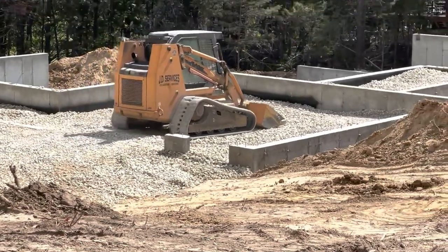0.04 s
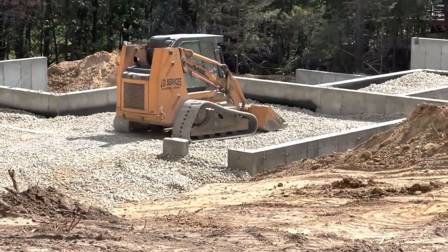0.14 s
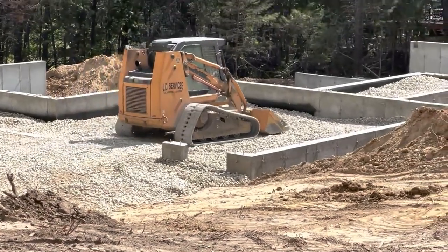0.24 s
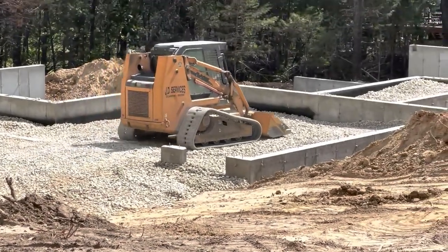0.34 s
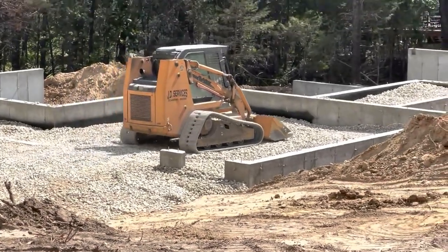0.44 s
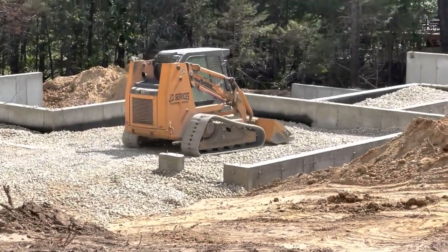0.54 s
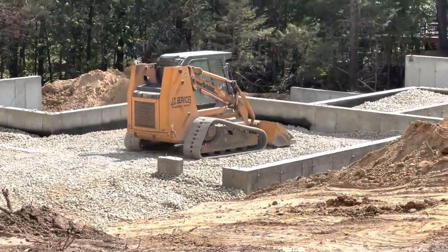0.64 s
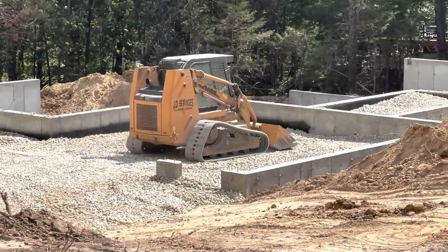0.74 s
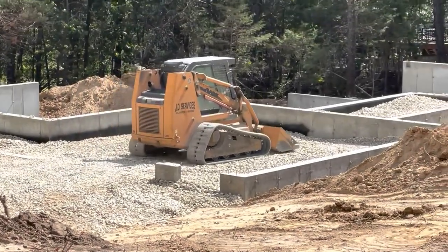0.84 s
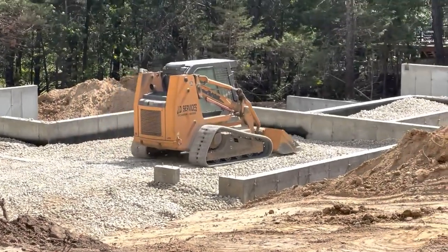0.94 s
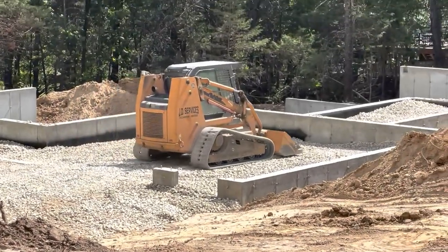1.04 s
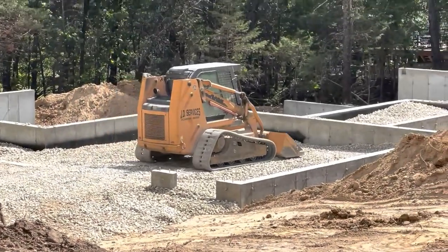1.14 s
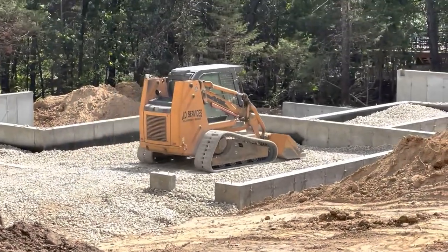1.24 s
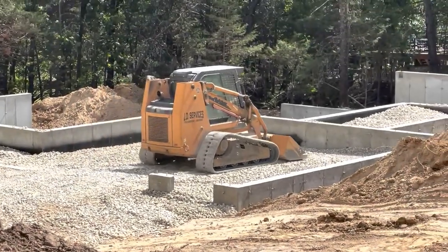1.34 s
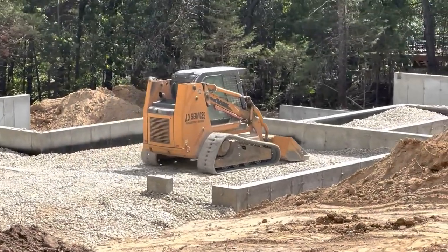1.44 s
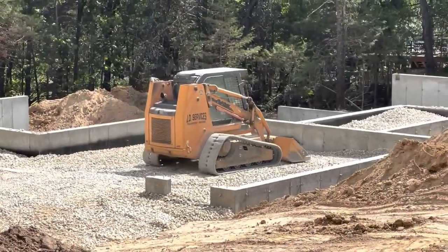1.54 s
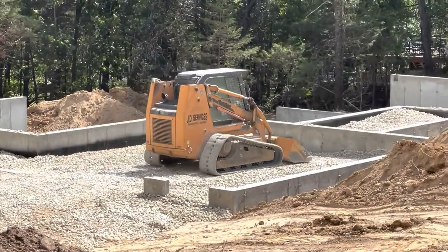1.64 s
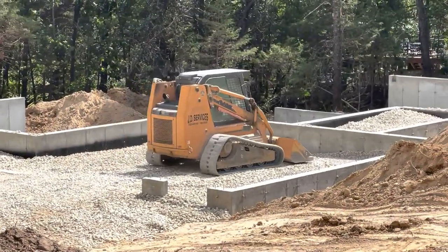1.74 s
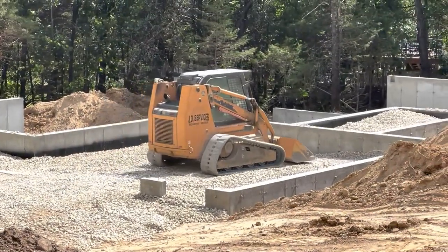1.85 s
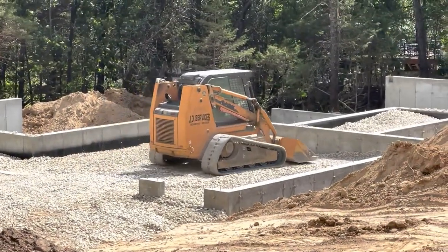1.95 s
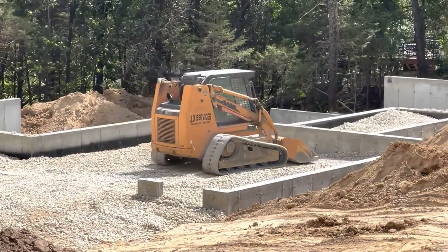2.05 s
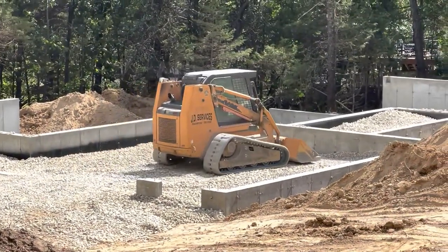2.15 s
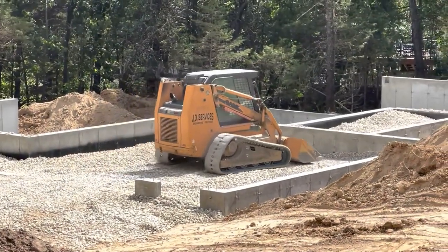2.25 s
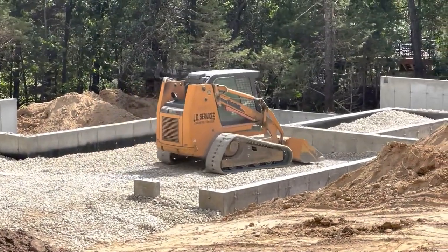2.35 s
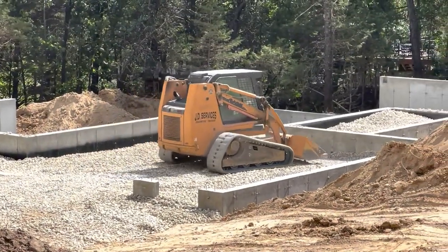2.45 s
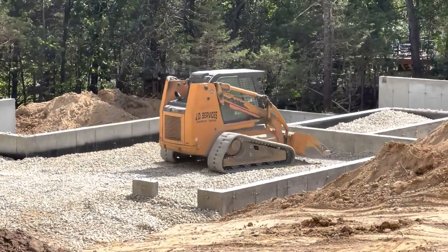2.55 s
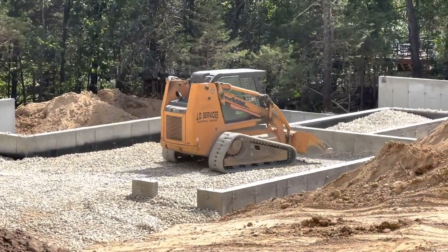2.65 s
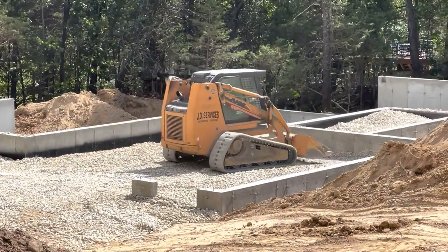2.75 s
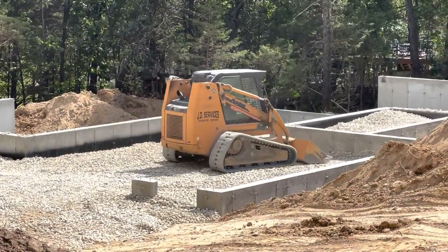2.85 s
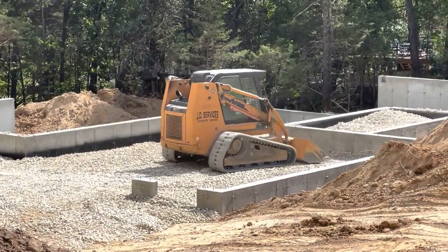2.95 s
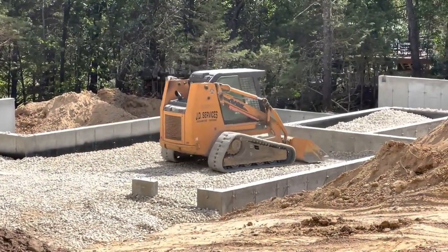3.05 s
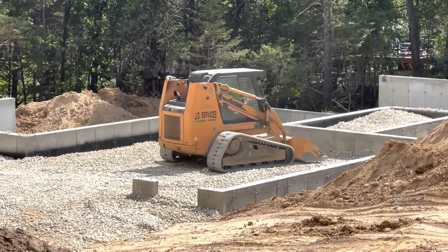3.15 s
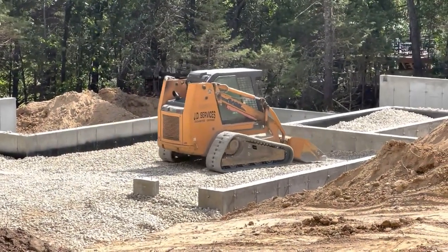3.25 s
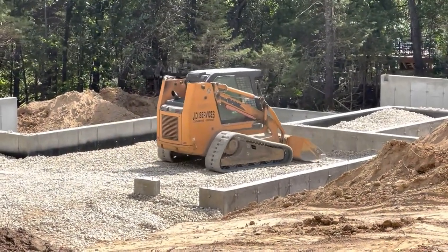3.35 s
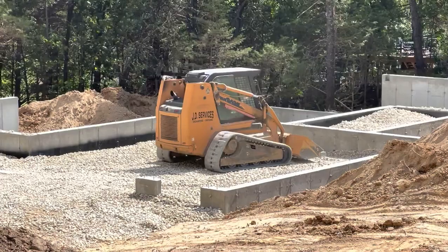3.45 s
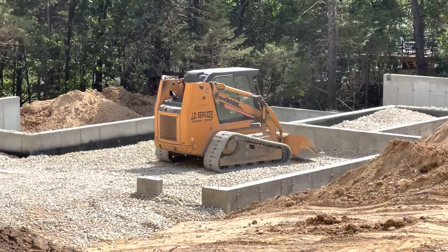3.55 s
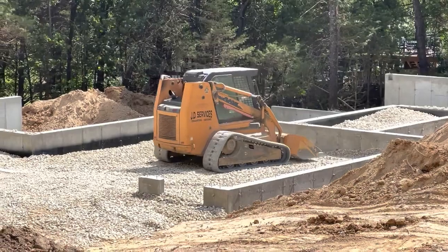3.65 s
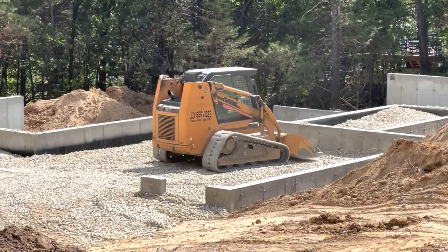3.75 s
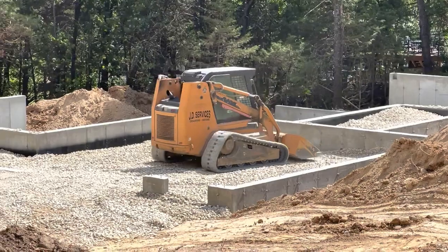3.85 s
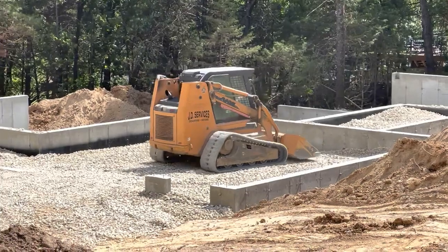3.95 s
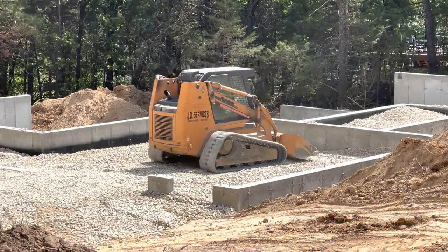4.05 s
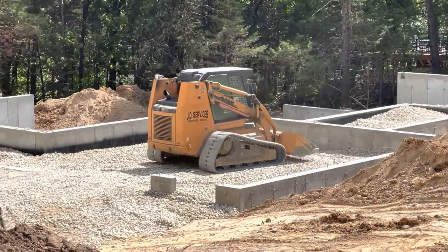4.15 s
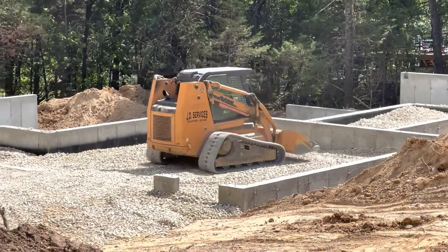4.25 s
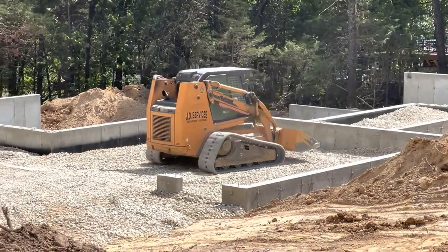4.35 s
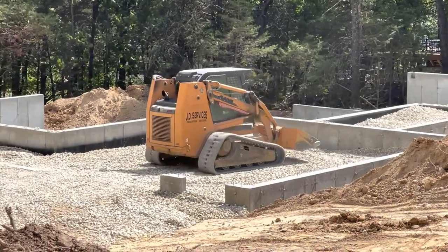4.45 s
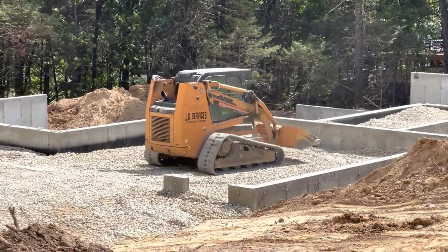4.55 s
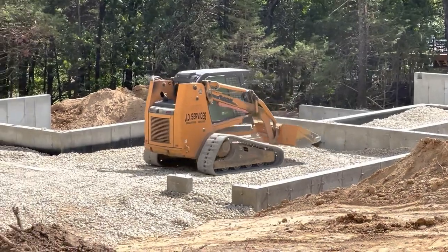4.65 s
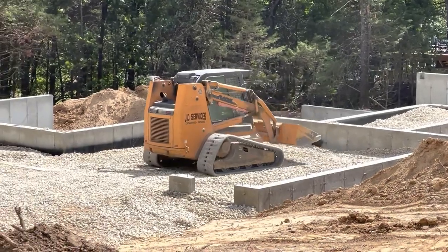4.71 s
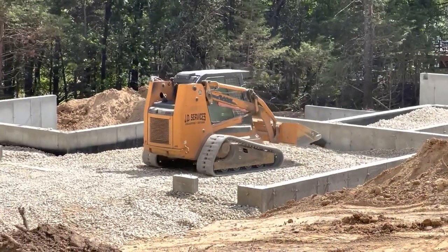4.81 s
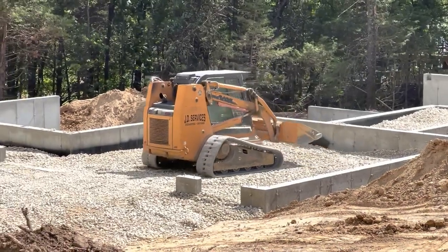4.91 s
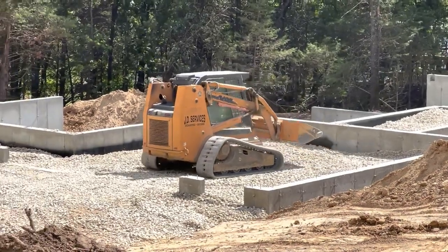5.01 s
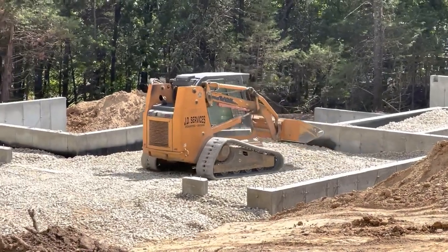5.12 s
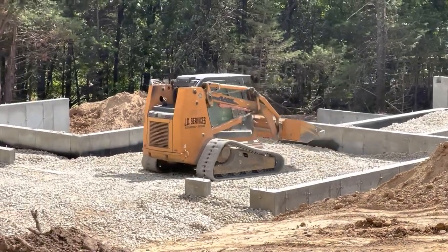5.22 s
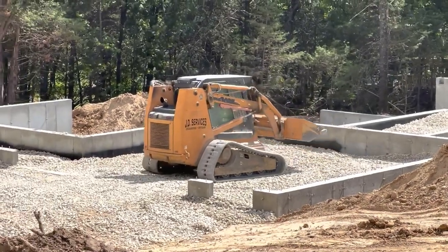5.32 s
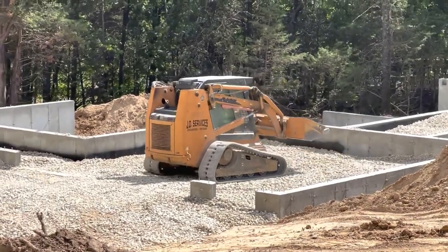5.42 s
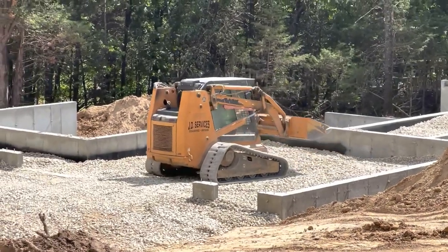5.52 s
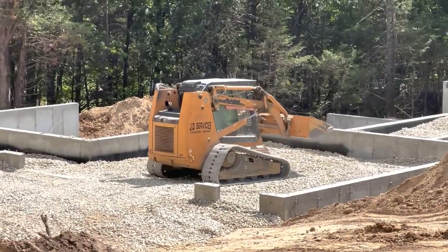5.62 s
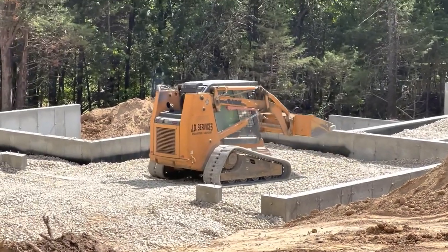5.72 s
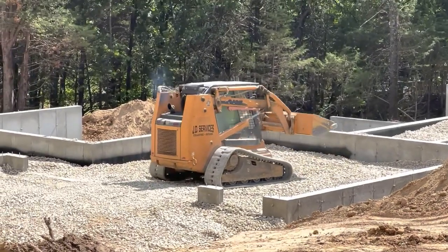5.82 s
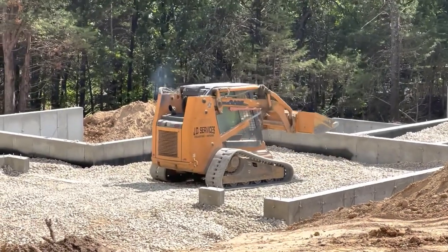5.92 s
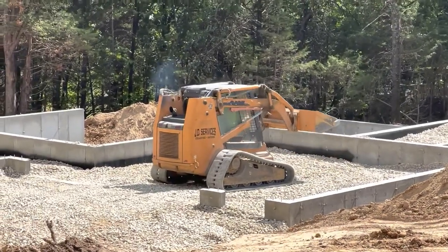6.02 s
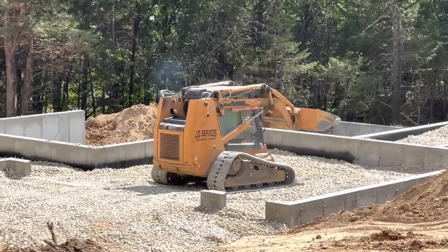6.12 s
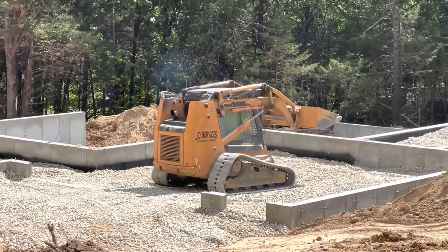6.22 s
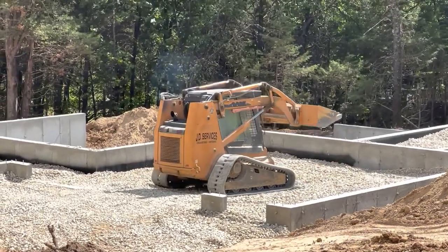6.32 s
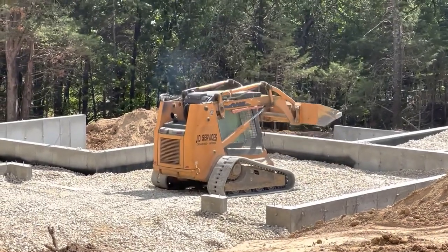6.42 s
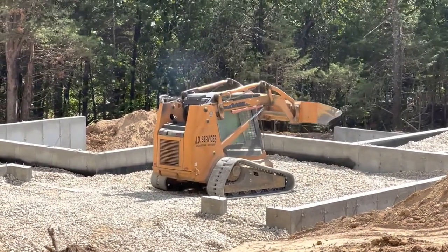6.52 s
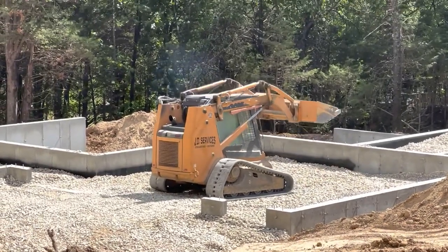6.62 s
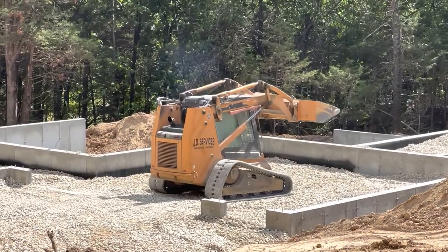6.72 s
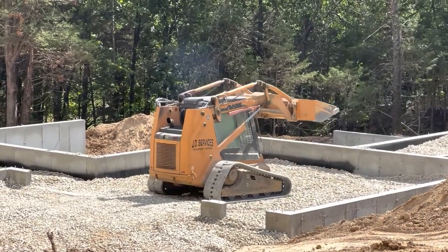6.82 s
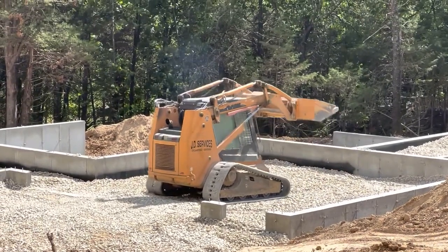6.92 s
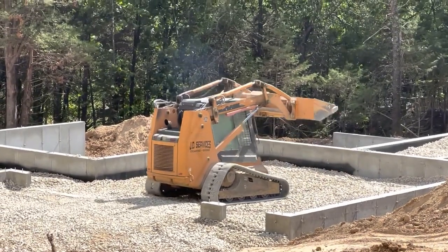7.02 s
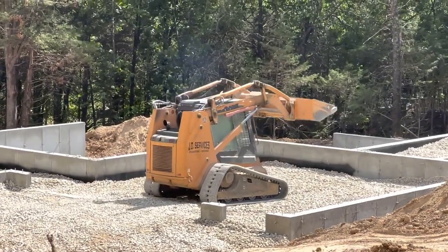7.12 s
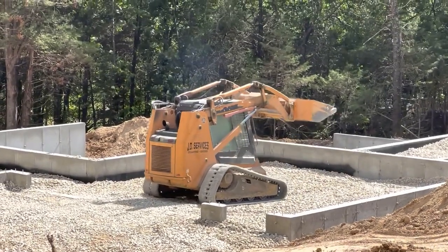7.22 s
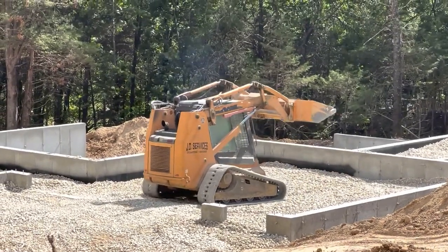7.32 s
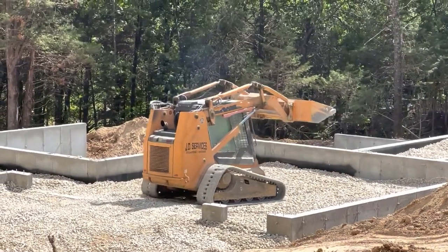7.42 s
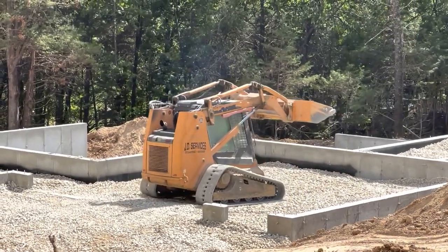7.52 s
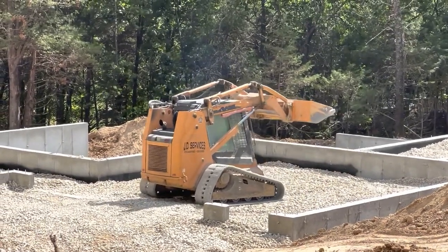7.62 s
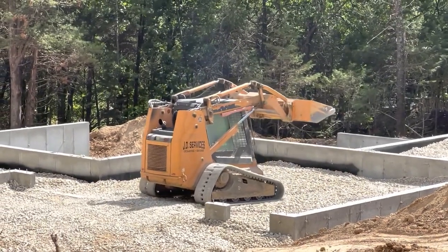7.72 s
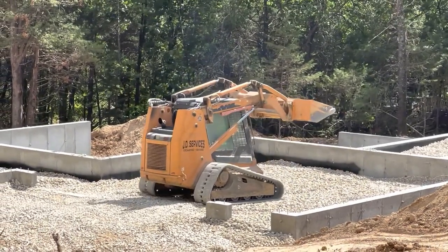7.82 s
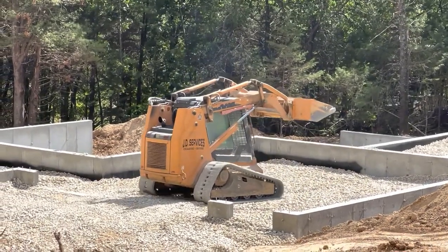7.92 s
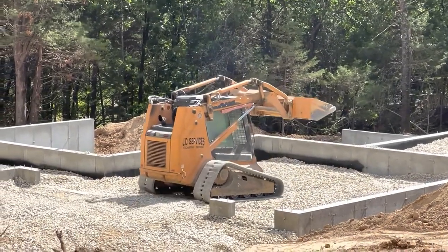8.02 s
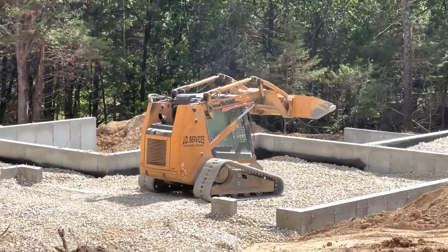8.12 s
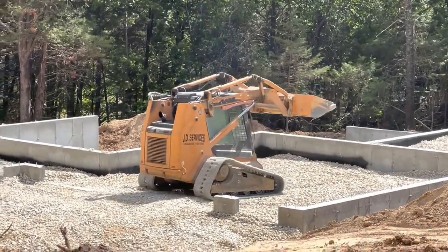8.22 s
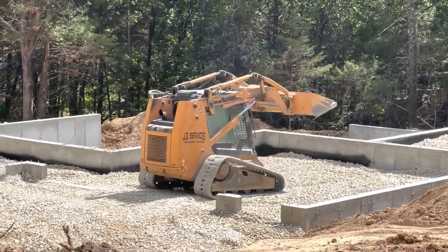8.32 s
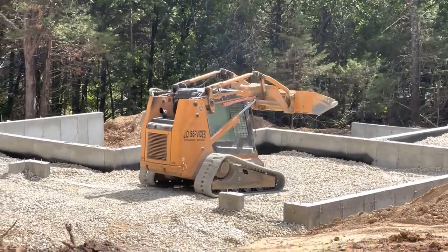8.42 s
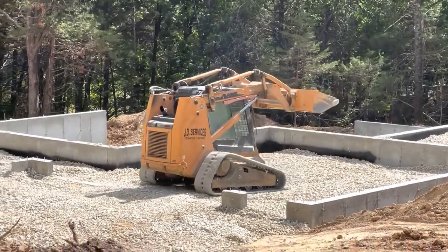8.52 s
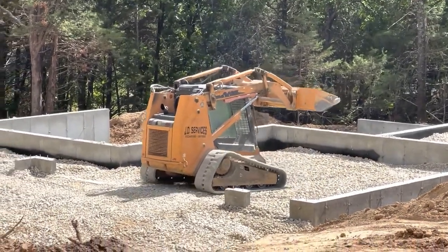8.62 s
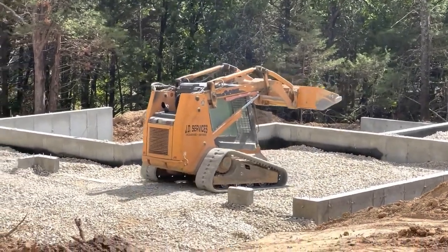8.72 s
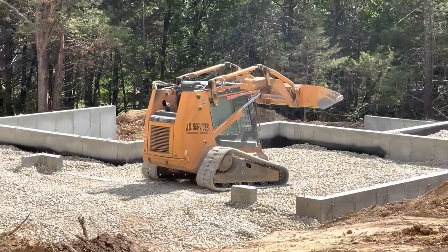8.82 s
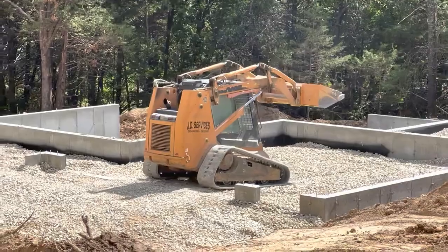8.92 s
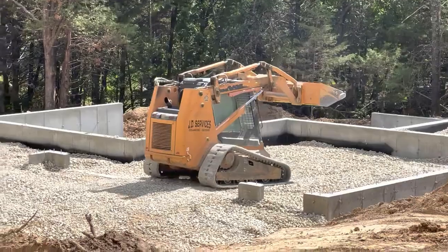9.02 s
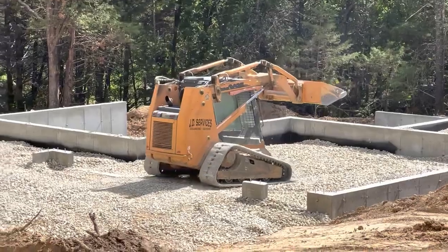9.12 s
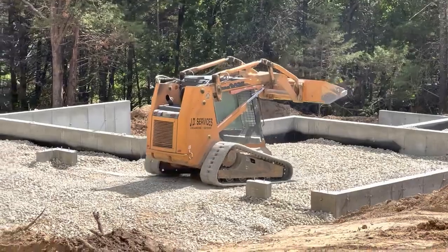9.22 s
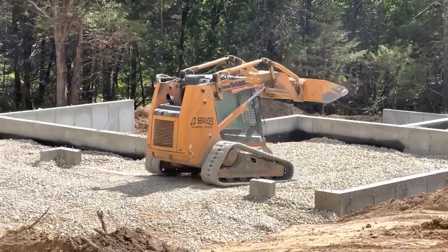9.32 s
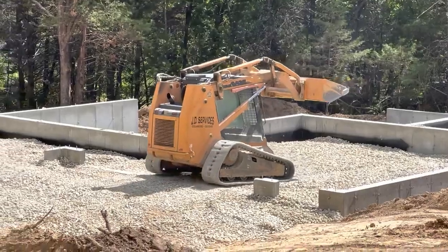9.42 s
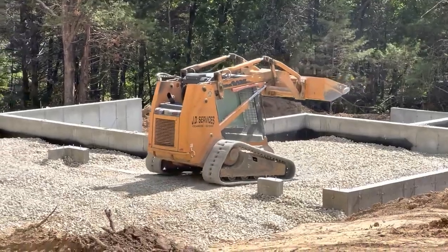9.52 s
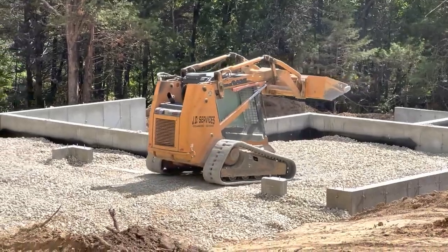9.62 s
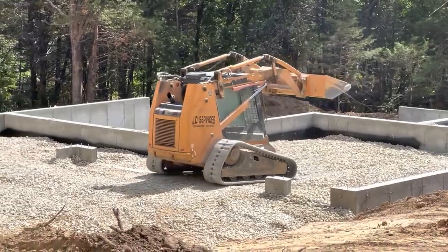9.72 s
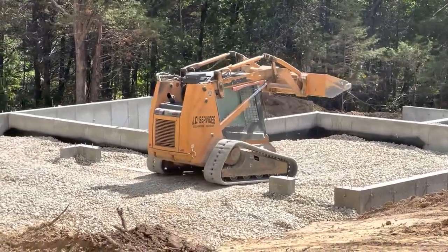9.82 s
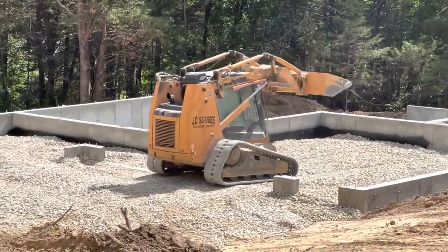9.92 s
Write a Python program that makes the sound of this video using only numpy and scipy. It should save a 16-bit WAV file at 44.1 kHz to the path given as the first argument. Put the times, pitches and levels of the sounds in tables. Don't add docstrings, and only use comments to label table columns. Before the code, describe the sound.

A diesel tracked loader runs throughout, some way off in the open, nearly mono with only slight scattered echo. Its low firing throb sits near 53 Hz under fan roar, valve clatter, pump tones and a fuzzy blower whine around 2.4 kHz. From 0 to 2.5 s rolling tracks add hiss, fine ticks and short high squeaks, with stone knocks at 0.8 and 1.3 s. At 2.8-3.1 s the bucket bites gravel: dense bright crunch, cracks and hollow booms. A duller, boomy bite comes at 3.7 s with small clanks. Ticks and knocks continue; from 4.8 s the engine sags. At 5.6 s throttle makes it surge, rising until about 6.3 s, and fall back by 6.8 s. Chirps and a sharp steel clank land at 6.7-6.9 s. It then drones steadily, slowing slightly, with squeaks at 8.0 and 9.3-9.4 s and light clanks near 9.6 s, still running at the end.

```python
import sys
import numpy as np
from scipy import signal
from scipy.fft import rfft, irfft, next_fast_len
from scipy.io import wavfile
from scipy.ndimage import uniform_filter1d

SR = 44100
rng = np.random.default_rng(int(sys.argv[2]) if len(sys.argv) > 2 else 0)


def level_to_linear(level):
    exponent = np.asarray(level, float) / 20
    return 10 ** exponent


def transcribe(u):
    v = np.clip(np.atleast_2d(u).T, -1, 1)
    q = np.round(v * 32767).astype(np.int16)
    wavfile.write(sys.argv[1], SR, q)


N = 439236

# freq_hz, lead_rad
PORT_LEAD_RAD = [(0, .11), (110, .2), (250, .1), (400, .08), (4200, 0.07), (5350, 1.0), (5850, 0.3),
                 (6900, 0.9), (7250, 0.3), (7750, 3.14), (9300, 2.95), (10200, 0.2), (11150, -0.2),
                 (12750, -3.14), (13850, -3.14), (14700, -5.7), (22050, -7)]
# freq_hz, level_db
PORT_LEAN_DB = [(40, -0.6), (250, 0), (600, -1.5), (1100, 0.7), (2000, -0.9), (16000, 1.6)]
# freq_hz, level_db
SCATTER_DB = [(40, -65), (100, -54), (220, -36), (520, -13.5), (900, -16.5), (1400, -22), (2000, -43),
              (4000, -22), (7200, -12.5), (8200, -16), (11500, -8), (13500, -15), (16000, -17)]
# start_s, level_db
TICKS = [(1.2316, -41), (1.3054, -46), (1.5519, -46), (1.6609, -43), (1.7818, -40), (1.8846, -40),
         (1.9165, -35), (1.9697, -41), (2.0338, -39), (2.2184, -45), (2.3206, -45), (2.4134, -45),
         (2.6628, -44), (2.9487, -47), (3.9125, -38), (3.9893, -43), (4.0916, -42), (4.1979, -37),
         (4.2857, -41), (4.3146, -42), (4.385, -43), (4.4692, -43), (4.5528, -37.5), (4.8085, -44),
         (5.0913, -45), (5.2004, -45), (6.4016, -37), (6.8743, -45), (9.0478, -51), (9.7624, -51)]
# start_s, length_s, first_hz, last_hz, peak_db
SQUEAKS = [(0.672, 0.025, 5250, 5100, -39.5), (.708, .035, 5150, 5000, -45), (1.173, 0.13, 6500, 6600, -35),
           (1.27, 0.09, 6430, 6620, -40.5), (1.274, .045, 7150, 7140, -40), (1.87, 0.035, 6300, 6250, -50),
           (1.975, 0.032, 5300, 4900, -44), (2.07, .022, 5230, 5300, -41), (2.083, 0.023, 4960, 5000, -34),
           (2.099, .016, 4750, 4450, -35), (2.125, 0.023, 4750, 4200, -39), (2.113, 0.047, 4650, 5200, -41),
           (2.15, 0.044, 5280, 5340, -44), (9.571, .06, 2700, 2680, -48), (2.518, 0.07, 7180, 6930, -34),
           (2.512, 0.045, 8600, 8350, -30), (2.64, .04, 6500, 6400, -51), (3.99, 0.095, 12400, 12400, -48),
           (4.22, .09, 8770, 8700, -50), (6.663, 0.025, 2880, 2900, -38), (6.681, .035, 2950, 2920, -39),
           (6.772, 0.019, 2950, 2900, -37), (6.768, .02, 3200, 3150, -40), (6.782, 0.03, 3140, 3100, -38),
           (6.831, .026, 3400, 3200, -37), (8.039, 0.12, 3380, 3760, -40), (8.148, .06, 3650, 3400, -46),
           (9.297, .025, 3350, 3330, -45), (9.349, .03, 3300, 3280, -37), (9.37, .035, 3350, 3350, -47),
           (9.391, 0.04, 3240, 3080, -34), (9.415, .035, 3050, 3000, -41), (9.42, 0.056, 3270, 3310, -33.5),
           (9.57, 0.12, 1900, 1870, -49), (9.398, .06, 6140, 6560, -58), (6.675, .035, 5800, 5850, -51),
           (6.772, .035, 5900, 5850, -48), (6.775, .03, 6200, 6150, -52)]
# freq_hz, density_db_per_hz
STONE_DB = [(150, 2), (480, -10), (800, 2), (1500, 3.5), (3900, 1.5), (5500, -8.5), (7300, -15),
            (8500, -38), (10000, -18.5), (13000, -42), (15500, -52)]
# start_s, level_db, ring_hz
KNOCKS = [(0.8056, -27.5, 3500), (1.284, -27.5, 3690), (2.823, -32, 3680), (2.854, -30, 2960),
          (3.149, -29.5, 3230), (3.3994, -34, 4060), (3.8785, -30, 4150), (3.884, -34, 2500),
          (4.2994, -33, 2590), (4.3894, -40, 3250), (4.587, -30, 3450), (4.7696, -30.5, 3900),
          (6.8356, -32, 3340), (9.559, -28, 4050), (9.656, -27.5, 4170), (9.7597, -38, 3550),
          (9.8494, -44, 4720)]
# start_s, level_db, ring_hz
CLANKS = [
    (3.729, -23, 1900),
    (3.757, -22, 1900),
    (6.906, -15, 2150),
    (6.907, -28, 4050),
    (9.5597, -30, 1890),
    (9.6564, -24, 1965),
]
# start_s, level_db, ring_hz
BOOMS = [(2.8, -20, 764), (2.86, -20, 950), (2.912, -15, 880), (2.94, -13, 810), (2.948, -10, 200),
         (2.972, -9, 300), (2.982, -16, 440), (3.002, -16, 800), (3.03, -19, 258), (3.688, -5, 270),
         (3.707, -9, 265)]
# start_s, level_db, ring_hz
CRACKS = [(2.9489, -9.5, 4400), (2.951, -8, 2950), (2.9555, -5, 3300), (2.963, -8, 3600),
          (3.0013, -9, 3870), (2.996, -11, 2050), (3.0032, -11, 1890), (3.005, -10, 2500),
          (3.012, -12, 1960), (3.058, -15, 2620), (3.669, -13, 910), (3.678, -14, 1830), (3.689, -15, 1400),
          (3.7635, -17, 2500), (3.764, -21, 4150), (3.756, -19, 3100), (3.758, -18, 1500),
          (3.679, -26, 3200)]
# start_s, crunch_db, thud_db, dullness_0_to_1
BITES = [(2.8, -37, -31, .3), (2.824, -34.5, -42, 0.25), (2.869, -41, -32, .25), (2.89, -31, -38, 0.4),
         (2.908, -27, -29, 0.3), (2.933, -24, -47, 0.36), (2.944, -26, -40, 0), (2.954, -19.5, -24.5, 0.1),
         (2.967, -21, -31, 0), (2.976, -31, -22.5, 0), (2.987, -29, -21.5, 0), (2.996, -19.5, -24.5, 0),
         (3.006, -19, -35, 0), (3.019, -30, -33, 0.4), (3.034, -43, -31, .05), (3.05, -28, -40, 0.05),
         (3.07, -31, -34, 0), (3.095, -34.5, -32, 0.1), (3.672, -27.5, -43, 0.95), (3.682, -29, -43, 0.9),
         (3.691, -29, -31, .9), (3.703, -37, -32, 1), (3.715, -41, -38, 1), (3.73, -38, -42, 1),
         (3.755, -29, -49, 0.5), (3.766, -30, -52, 0.5), (3.777, -34, -52, .6)]
# time_s, firing_hz
SPEED_HZ = [(0, 53.4), (2.6, 53.3), (2.9, 54.5), (3.6, 54.6), (4.8, 52.0), (5.05, 48), (5.62, 46.2),
            (5.71, 49.1), (5.91, 60.7), (6.02, 64.8), (6.12, 67), (6.3, 67.6), (6.45, 66.3), (6.55, 63.3),
            (6.77, 53.6), (6.9, 52.1), (8.85, 50.8), (9.96, 49.5)]
# time_s, firing_tone_db, roar_db
EFFORT_DB = [(0, -31.5, -33.5), (1.08, -32, -33.5), (2.14, -30, -36), (2.66, -29.5, -36),
             (2.83, -33.5, -35.5), (2.97, -29.5, -36.5), (3.7, -30.5, -35), (4.6, -28, -34.5),
             (5.22, -32.5, -36.5), (5.6, -37.5, -38), (5.72, -24.5, -31.5), (5.85, -21.5, -32.5),
             (6.02, -20.5, -32.5), (6.35, -26.5, -33.5), (6.52, -22, -35), (6.88, -32.5, -35),
             (7.05, -31, -35), (9.96, -29, -35)]
# start_s, end_s, lift_db
STRAIN_DB = [
    (.12, .3, 5),
    (.5, 1.4, 4),
    (3.45, 3.7, 3),
    (3.95, 4.76, 5),
    (6.65, 6.83, 10),
    (7.3, 8.0, -7),
    (9.1, 9.96, 5.5),
]
# start_s, end_s, hiss_lift_db
ROLLING_DB = [
    (0, 1.15, 5.5),
    (1.35, 2.45, 6.5),
    (3.85, 5.25, 3),
    (6.2, 6.5, 1),
    (6.8, 7.3, -2),
    (7.45, 9.1, -0.5),
    (9.5, 9.96, -2),
]
# start_s, end_s, lift_db
BLOWER_DB = [(0, .3, 7), (.3, .95, 1), (5.5, 5.63, 2), (9.2, 9.6, 2.5), (2.6, 3.5, 4), (3.75, 4.7, 7.5),
             (5.64, 6.0, 3), (6.05, 6.4, -2), (6.4, 7.4, 1), (7.9, 9.6, 3), (9.6, 9.96, 8)]
# crank_multiple, level_db
ORDERS_DB = [(3, -15), (5, -14), (7, 1), (8, -7), (9, -17.5), (10, -12.5), (15.5, -11.5), (18, -16)]
# freq_hz, width_hz, lift_db
PIPE = [(253, 14, 9.5), (445, 16, 14), (530, 18, 1.5)]
# freq_hz, width_hz, lift_db
BOX = (106.5, 8.5, 12)
# crank_multiple, level_db
PUMP_DB = [(28, -7), (30, 0), (32, -1), (34, -1), (36, -6), (40, -3.5), (42, -5), (46, -6), (48, 1),
           (50, -15), (56, 2)]
# start_s, end_s, crank_multiple, level_db
DRONES = [(.5, 0.92, 10, -40), (1.8, 2.45, 9, -40.5), (.5, 1.06, 9, -41), (1.3, 1.45, 10, -38.5),
          (2.0, 2.33, 10, -40.5), (3, 3.4, 9, -40.5), (3.5, 4.16, 10, -40), (7, 7.9, 10, -45),
          (7.2, 8.0, 7, -37.5), (8.5, 8.95, 7, -39), (9.1, 10.2, 7, -36), (8, 8.0, 8, -37.5),
          (0, 0.6, 14, -46.5), (3, 3.66, 14, -43.5), (2.5, 2.76, 3, -34), (3.08, 3.24, 3, -35),
          (3.5, 3.94, 3, -33), (0, 1, 3, -41.5), (7.5, 7.9, 14, -48), (9.5, 12, 15.5, -51),
          (1.3, 2.1, 6, -46), (7, 8.7, 6, -42.5), (4.5, 5, 6, -40.5), (9, 9.7, 6, -42.5),
          (7.5, 6.75, 7, -43), (5.95, 6.5, 8, -33), (5.66, 5.9, 6, -46), (6.35, 6.56, 15.5, -43),
          (6.5, 6.68, 14, -43.5), (5.85, 6.2, 14, -43.5), (6.18, 6.36, 3.5, -40), (5.98, 6.14, 4.5, -37),
          (6.1, 6.4, 10, -44.5), (5.68, 5.95, 17, -46), (1.3, 1.76, 34, -47), (0.5, 3, 28, -49),
          (3.5, 4.8, 30, -44), (4, 5.04, 34, -49.5), (6.5, 9.2, 32, -46.5), (7.1, 9.5, 30, -46.5),
          (9, 9.96, 28, -47), (7.5, 9.6, 48, -45.5), (7, 9.1, 42, -48), (7.5, 8.85, 36, -43.5),
          (5.75, 6.7, 26, -46), (6, 6.6, 30, -49), (5.75, 6.5, 36, -48), (7, 6.6, 40, -55)]
# freq_hz, density_db_per_hz
ROAR_DB = [(20, -39), (40, -2.5), (75, -1.5), (110, -3), (180, -4), (250, -4), (320, -9), (560, -13.5),
           (780, -8.5), (1000, -12), (1250, -8), (1600, -14.5), (2100, -21), (3000, -44)]
# freq_hz, density_db_per_hz
CLATTER_DB = [(1200, -14), (1900, 1.5), (2250, -3), (3000, -2.5), (4000, -5), (5200, -8), (6100, -16),
              (7200, -14.5), (8400, -18), (10500, -25.5), (11600, -20.5), (13200, -34), (14400, -42),
              (15400, -49)]
# freq_hz, width_hz, level_db
PANELS = [(782, 89, -5), (914.5, 14, -7), (1080, 62, -14), (1230.5, 57, 0.5), (1469, 13.5, -7),
          (1890, 43, -14.5), (3386, 40, -17.5), (3803, 58, -16.5), (4320, 71, -17.5), (4926, 60, -18.5)]

STAB_S = 5.6
CRUISE_HZ = 53
WHINE_HZ, WHINE_BOOST_HZ = 2436, 324


def evened(x):
    return x / np.sqrt(np.mean(x ** 2) + 1e-20)


def read(points, hz):
    f, value = np.transpose(points)
    return np.interp(np.log(hz + 1), np.log(f + 1), value)


def add(mix, start, sound):
    part = mix[start:][:len(sound)]
    part += sound[:len(part)]


def colour(x, points):
    size = next_fast_len(len(x))
    gain = level_to_linear(read(points, np.fft.rfftfreq(size, 1 / SR)))
    return irfft(rfft(x, size) * gain, size)[:len(x)]


def band(x, hz, width_hz):
    return signal.lfilter(*signal.iirpeak(hz, hz / width_hz, SR), x)


def lift(hz, centre_hz, width_hz, peak_db):
    return peak_db / (1 + ((hz - centre_hz) / width_hz) ** 2)


def wander(rate_hz, size=N):
    at = np.arange(size) * (8 * rate_hz / SR)
    points = evened(uniform_filter1d(rng.standard_normal(size // 32 + 64), size=5))
    return np.interp(at, np.arange(len(points)), points)


def follow(rows):
    s, *values = np.transpose(rows)
    return [np.interp(np.arange(N) / SR, s, v) for v in values]


def spans(rows):
    t = np.arange(N) / SR
    steps = sum(db * ((t >= a) & (t <= b)) for a, b, db in rows)
    return uniform_filter1d(steps, size=int(0.087 * SR))


def stab(rise_s, hold_s, fall_s):
    since = np.arange(N) / SR - STAB_S
    return np.clip(since / rise_s, 0, 1) * np.exp(-np.maximum(since - rise_s - hold_s, 0) / fall_s)


def side_echoes(machine):
    echoes = rng.standard_normal(6000) * level_to_linear(-60 * np.arange(6000) / SR / 0.082)
    tail = signal.oaconvolve(machine, echoes / np.linalg.norm(echoes))[:N]
    return colour(tail, SCATTER_DB)


def roller_tick(s, db):
    t = np.arange(2400) / SR
    blow = rng.standard_normal(len(t)) * level_to_linear(-60 * t / 0.085) * np.minimum(t / 0.0067, 1)
    modes = [(11600, 0.72), (8450, 0.86), (15100, 0.18), (12400, 0.43), (12930, 0.25)]  # ring_hz, share
    rings = sum(share * band(band(blow, hz, 540), hz, 210) for hz, share in modes)
    return round(s * SR), level_to_linear(db + 4.5) * rings / abs(rings).max()


def squeak(s, length_s, first_hz, last_hz, peak_db):
    size = round(length_s * SR)
    way = np.arange(size) / size
    peak_at = 0.54 if last_hz - first_hz > 250 else 0.3
    db = peak_db + np.interp(way, [0, peak_at, 1], [-13, 0, -18])
    hz = first_hz + (last_hz - first_hz) * way + 50 * wander(99, size)
    phase = 2 * np.pi * np.cumsum(hz) / SR
    whistle = level_to_linear(db + 3.1 * wander(110.4, size)) * (np.sin(phase) + 0.085 * np.sin(2 * phase))
    whistle *= signal.windows.tukey(size, .2)
    echo = rng.standard_normal(2500) * level_to_linear(-60 * np.arange(2500) / SR / 0.27)
    echoed = signal.fftconvolve(whistle, echo / np.linalg.norm(echo))
    return round(s * SR), 1.62 * np.pad(whistle, (0, len(echo) - 1)) + 0.53 * echoed


def knock(s, db, hz, t60_s, crack):
    t = np.arange(3500) / SR
    noise = rng.standard_normal(len(t))
    ring = evened(band(band(noise, hz, 300), hz, 110)) + 1.1 * np.sin(2 * np.pi * hz * t)
    sound = ring + crack * evened(colour(noise, STONE_DB))
    return round(s * SR), level_to_linear(db - 13.5 - 60 * t / t60_s) * sound * np.minimum(t / 0.0013, 1)


def bucket_bite(s, crunch_db, thud_db, dull):
    size, lead_s = 6000, .03
    t = np.arange(size) / SR - lead_s
    crunch_db = crunch_db + np.minimum(1800 * t, -550 * t)
    thud_db = thud_db + np.minimum(900 * t, -325 * t)
    grains = evened(colour(rng.standard_normal(size) * level_to_linear(1.7 * wander(118, size)), STONE_DB))
    crunch = (1 - dull) * grains + dull * evened(band(grains, 990, 600))
    low = rng.standard_normal(size)
    body = evened(band(low, 244, 65)) + 0.95 * evened(band(low, 133, 50)) + 0.2 * evened(band(low, 390, 90))
    thud = evened(body) + 0.2 * np.sin(2 * np.pi * 242 * (s + t))
    sound = level_to_linear(crunch_db) * crunch + level_to_linear(thud_db) * thud
    return round((s - lead_s) * SR), signal.windows.tukey(size, .1) * sound


def track_singing(push, rolling_db):
    noise = push * rng.standard_normal(N)
    return level_to_linear(-85 + 3 * rolling_db) * evened(band(band(noise, 15300, 800), 15300, 1600))


def blower_whine(crank, push, fuel, off_hz):
    boost = stab(.19, .1, .16)
    sharpness = 0.45 + 1.8 * fuel
    whine_hz = WHINE_HZ + WHINE_BOOST_HZ * boost + 17 * np.minimum(off_hz + 2, 0)
    whine_db = -52 + 10 * np.sqrt(np.maximum(fuel, boost)) + spans(BLOWER_DB)
    slip_hz = 270 * fuel * (.5 - crank / np.pi % 1)
    phase = 2 * np.pi * np.cumsum(whine_hz + slip_hz + 20 * wander(14)) / SR
    whine = (0.75 + 0.4 * wander(45)) * np.sin(phase + (0.51 + 0.75 * sharpness) * wander(75))
    upper = np.sin(2 * np.pi * 2900 * np.arange(N) / SR + 1.2 * wander(40))
    whine += 0.16 * sharpness * wander(45) * upper
    octave = np.sin(4 * np.pi * np.cumsum(whine_hz) / SR + 3 * wander(60))
    whine += 0.24 * np.clip((whine_hz - WHINE_HZ) / WHINE_BOOST_HZ, 0, 1) * wander(45) * octave
    return whine * push * level_to_linear(whine_db + 1.7 + 0.37 * wander(12))


def fan_roar(push, roar_db):
    noise = push ** 0.76 * rng.standard_normal(N) * level_to_linear(0.74 * wander(9))
    return level_to_linear(roar_db + 1.5) * evened(colour(noise, ROAR_DB))


def panel_ring(push, roar_db):
    drive = push * rng.standard_normal(N)
    rings = sum(level_to_linear(db + 1.8 * wander(3)) * evened(band(band(drive, hz, 3 * width_hz), hz, width_hz))
                for hz, width_hz, db in PANELS)
    return level_to_linear(roar_db - 6) * evened(push ** 0.75 * rings)


def clatter(push, roar_db, fuel, rolling_db):
    clatter_db = roar_db - 10 + 3 * fuel + 0.48 * rolling_db
    noise = push ** 0.81 * level_to_linear(0.73 * wander(8)) * rng.standard_normal(N)
    sound = evened(colour(noise, CLATTER_DB))
    hiss = signal.sosfilt(signal.butter(4, 7600, "high", fs=SR, output="sos"), sound)
    hiss_db = -45.5 + rolling_db - clatter_db
    sound += (level_to_linear(hiss_db + 2.6 * wander(12)) - 1) * hiss
    return level_to_linear(clatter_db + 0.2) * sound


def pump(crank, firing_hz, pump_db):
    out = np.zeros(N)
    for k, db in PUMP_DB:
        lift_db = sum(lift(k * firing_hz / 2, hz, 30, 8) for hz, _, _ in PANELS[:4])
        out += level_to_linear(pump_db + db + lift_db - 3.5 + 2.2 * wander(.7)) * np.sin(k * crank + k * k)
    return out


def drone(crank, start_s, end_s, k, db):
    turn = crank[round(start_s * SR):round(end_s * SR)]
    size = len(turn)
    level = signal.windows.tukey(size, .5) * level_to_linear(db + 2.5 * wander(4.02, size))
    return round(start_s * SR), level * -np.sin(k * turn)


def exhaust(crank, firing_hz, tone_db, roar_db, fuel, strain_db):
    off_hz = firing_hz - CRUISE_HZ
    octave_db = tone_db - 23 + lift(2 * firing_hz, *BOX) + 17.5 * fuel + strain_db
    overtone_db = roar_db - 11 + 0.74 * np.maximum(off_hz, 0) * (1 - fuel) ** 2
    out = np.sqrt(2) * level_to_linear(tone_db + .5 * wander(5)) * np.sin(2 * crank)
    out += np.sqrt(2) * level_to_linear(octave_db + 1.7 * wander(3.7)) * np.sin(4 * crank + 0.7 * wander(3))
    bloom_db = 3 * np.clip(-off_hz, 0, 1.4) * (firing_hz > 50.3)
    out -= (level_to_linear(octave_db - 11) + level_to_linear(roar_db - 13.5 + 1.8 * wander(1.7) + bloom_db)) * np.sin(6 * crank)
    for k, db in ORDERS_DB:
        lift_db = sum(lift(k * firing_hz / 2, *row) for row in PIPE)
        level = level_to_linear(overtone_db + db + lift_db + 1.2 * wander(2.5))
        out += level * np.sin(k * crank + 0.05 * k * wander(4))
    return out


def engine():
    firing_hz, = follow(SPEED_HZ)
    tone_db, roar_db = follow(EFFORT_DB)
    fuel = stab(0.066, 0.18, 0.12)
    strain_db, rolling_db = spans(STRAIN_DB), spans(ROLLING_DB)
    off_hz = firing_hz - CRUISE_HZ
    crank = np.pi * np.cumsum(firing_hz * (1 + 0.001204 * wander(3))) / SR
    push = 1 + (0.45 + 1.8 * fuel) * np.exp(-(crank / np.pi % 1) / 0.33) * level_to_linear(2.6 * wander(25))
    push /= np.sqrt(uniform_filter1d(push ** 2, size=2000))
    out = exhaust(crank, firing_hz, tone_db, roar_db, fuel, strain_db)
    out += pump(crank, firing_hz, roar_db - 17 - 0.05 * abs(off_hz) + 0.39 * abs(strain_db))
    for row in DRONES:
        add(out, *drone(crank, *row))
    out += track_singing(push, rolling_db) + blower_whine(crank, push, fuel, off_hz)
    out += fan_roar(push, roar_db) + panel_ring(push, roar_db)
    return out + clatter(push, roar_db, fuel, rolling_db)


def scene():
    machine = engine()
    for row in BITES:
        add(machine, *bucket_bite(*row))
    # hits, t60_s, crack
    for hits, t60_s, crack in [(KNOCKS, 0.11, 2.6), (CLANKS, 0.054, 0.43), (BOOMS, .1, .05), (CRACKS, 0.043, 0.54)]:
        for row in hits:
            add(machine, *knock(*row, t60_s, crack))
    for row in SQUEAKS:
        add(machine, *squeak(*row))
    for row in TICKS:
        add(machine, *roller_tick(*row))
    for s, spread in rng.random((20, 2)):
        add(machine, *roller_tick(s * N / SR, -45 + 5 * (spread - .5)))
    side = side_echoes(machine)
    return machine * level_to_linear(np.array([[-.14], [.14]])) + np.array([side, -side])


def band_limit(x):
    return signal.sosfilt(signal.butter(12, 16850, fs=SR, output="sos"), x)


def record(dry):
    size = next_fast_len(N)
    hz = np.fft.rfftfreq(size, 1 / SR)
    lead_rad = np.interp(hz, *np.transpose(PORT_LEAD_RAD))
    turn = np.exp(.5j * np.outer([-1, 1], lead_rad))
    lean = level_to_linear(np.outer([.5, -.5], read(PORT_LEAN_DB, hz)))
    ports = irfft(rfft(dry, size) * turn * lean * (hz < 15650), size)[:, :N]
    return band_limit(ports)


dry = scene()
out = record(dry)
transcribe(out)
```